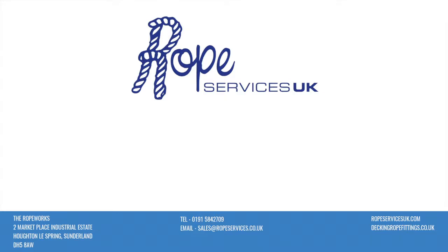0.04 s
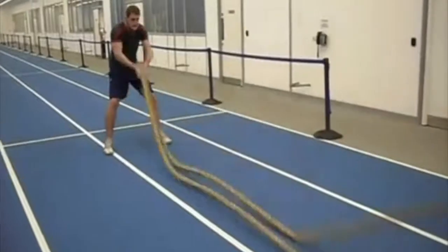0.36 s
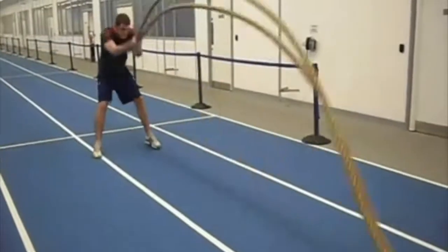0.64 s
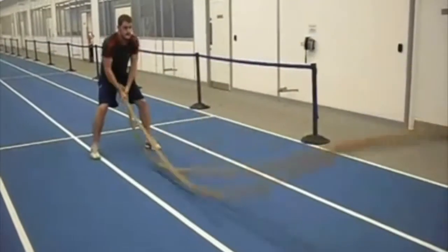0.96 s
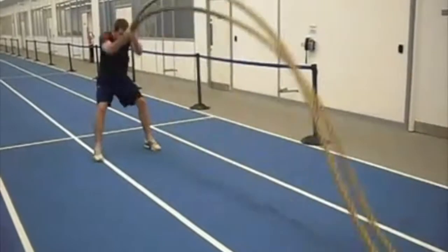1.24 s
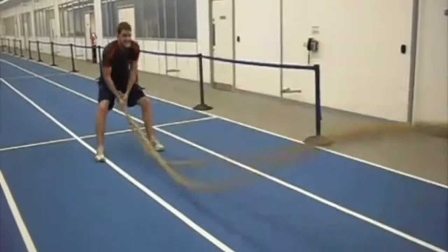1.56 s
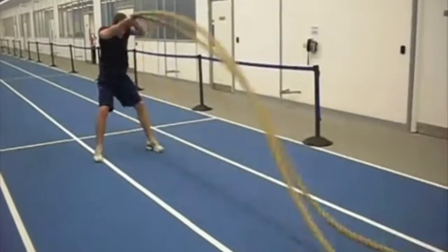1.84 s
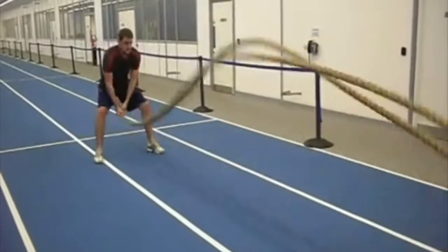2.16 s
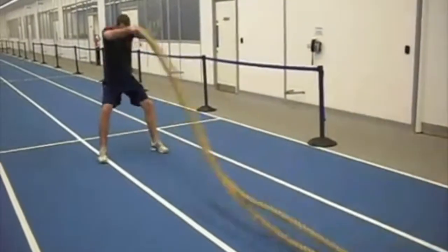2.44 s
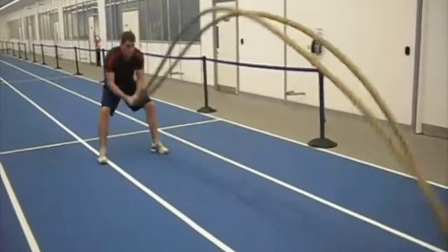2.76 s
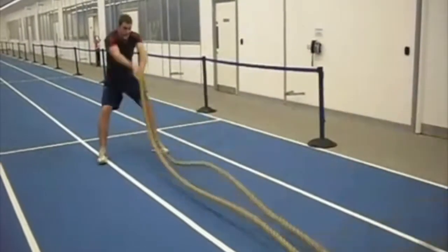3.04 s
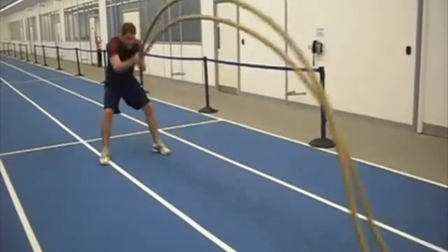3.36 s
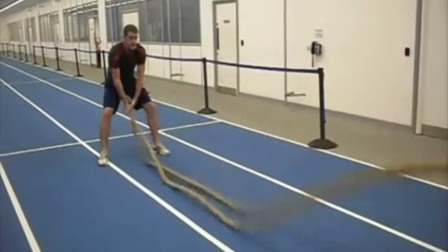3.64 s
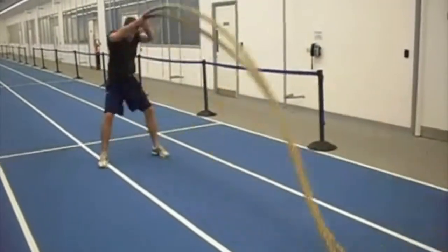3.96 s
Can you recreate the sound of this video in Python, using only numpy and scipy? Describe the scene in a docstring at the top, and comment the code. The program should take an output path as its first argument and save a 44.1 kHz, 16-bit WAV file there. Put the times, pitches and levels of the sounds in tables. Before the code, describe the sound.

Heavy ropes slap the floor again and again in a reverberant sports hall, thudding, clattering and then rustling as they slide. Their draught briefly rumbles on the microphone twice, while ventilation drones quietly underneath.

```python
"""In a sports hall, two heavy training ropes are whipped onto the floor, about three slams in two seconds.
Each impact is a dull thud, doubled by reflection from a near wall, and a clatter as more rope lays itself
down; the wave in the rope lands again farther along. Between slams the ropes rustle by sliding friction,
their draught buffets the microphone, and the hall reverberates over a low ventilation noise."""
import sys
import numpy as np
from scipy import signal
from scipy.fft import rfft, irfft, next_fast_len
from scipy.io import wavfile
from scipy.ndimage import map_coordinates

SR = 44100
rng = np.random.default_rng(int(sys.argv[2]) if len(sys.argv) > 2 else 0)


def master(y):
    """Save y as 16-bit WAV."""
    cut = np.clip(np.atleast_2d(y).T, -1, 1)
    pcm = np.round(cut * 32767)  # scale
    wavfile.write(sys.argv[1], SR, pcm.astype(np.int16))


N = 176400


def rope_landings(spot_count=8):
    """Impact excitation: a rope thuds at one spot and clatters over all; each has its own room response."""
    # Landings: (time [s], thud level [dB], thud pitch [Hz], crack level [dB], clatter level [dB],
    # clatter build-up [s], clatter T60 [s], tilt of crack and clatter [dB/octave])
    impacts = [ (0.4463, -10.5, 490, -26.5, -24, 0.0083, .10, 0),
               (0.454, -12.5, 267, -20.5, -25.5, 0.0066, 0.1, -0.5),
               (0.8110, -21, 423, -32, -32, 0.0041, 0.086, -.5),
               (0.8580, -21, 760, -39, -29, 0.011, 0.063, -1),
               (1.1004, -15.5, 418, -26.5, -20.5, .021, 0.065, 0.5),
               (1.4600, -8.5, 484, -19.5, -31.5, 0.007, 0.19, -2),
               (1.5256, -24, 500, -24, -28, 0.0064, .12, -3.5),
               (1.6130, -18.5, 390, -51, -41, 0.0066, .10, -10.5),
               (1.736, -10.5, 475, -23, -20.5, 0.021, 0.091, 1),
               (2.1330, -44, 402, -50, -31.5, 0.0086, 0.061, -4.5),
               (2.1780, -21.5, 394, -34, -41, 0.005, 0.15, 1),
               (2.2500, -24.5, 394, -63, -44, .006, .10, -26),
               (2.3140, -27.5, 410, -30, -62, .006, .08, -5),
               (2.4250, -8.5, 516, -19.5, -23.5, 0.0066, .10, 1),
               (2.4394, 1, 570, -19.5, -22, 0.0045, 0.15, 0.8),
               (2.7870, -18.5, 423, -25, -27.5, 0.013, 0.065, -0.4),
               (2.8530, -16.5, 463, -36, -25.5, 0.0056, 0.061, -1.5),
               (2.9000, -23, 430, -73, -42, .005, .10, -7),
               (2.9670, -20, 390, -29.5, -42.5, 0.0041, .10, -10),
               (3.0904, -12, 432, -22, -22, .021, 0.08, 1.5),
               (3.4937, -16, 390, -27.5, -28, .012, 0.11, -0.5),
               (3.5400, -21.5, 500, -49, -39, 0.0041, 0.087, -9),
               (3.5795, -17, 870, -29, -29, 0.0049, 0.093, -1.1),
               (3.7543, -20, 385, -42, -31.5, 0.012, 0.18, 1),
               (3.7767, -14.5, 430, -25.5, -23, 0.023, 0.14, 0.7), ]
    # Spectra of the fibres' first touch and of the strand impacts: (frequency [Hz], density [dB])
    crack_spectrum = [(60, -18), (160, -5), (300, -2), (750, -1), (1050, -3), (1500, 0), (2400, -6.5),
                      (3500, -13), (5500, -30), (10000, -34)]
    clatter_spectrum = [(60, -22), (150, -6.5), (300, 2.5), (750, 3), (1050, -0.5), (1500, 5), (2200, -3),
                        (3000, -9.5), (5500, -21.5), (10000, -31)]
    # How the hall takes up a thud: (frequency [Hz], gain [dB])
    thud_coupling = [(60, -3), (170, -4.5), (265, 2.5), (340, 0), (420, -5.5), (520, 0), (720, -2.5),
                     (1000, -16.5), (2000, -2.5), (9000, -5)]
    floor_db, floor_hz, floor_t60, crack_t60 = -18.5, 275.4, 0.018, 0.02  # T60 in seconds
    weight_db, weight_hz = -2, 166.5  # low push of the rope's weight, relative to the crack
    wall_delay_s, wall_db = 0.0072, -5.5
    thud_send_db, clatter_send_db = -2, -1  # into the hall
    first_touch, hold, strands_per_s = 0.22, 0.31, 3600  # shares of full strength and of build-up; rate
    direct, spots = np.zeros(N), np.zeros((spot_count, N))
    t = np.arange(SR // 5) / SR
    floor_ring = np.sin(2 * np.pi * floor_hz * t) * amp(floor_db - 60 * t / floor_t60)
    for k, (time, thud_db, pitch_hz, crack_db, clatter_db, build_s, t60, tilt_db) in enumerate(impacts):
        crack = coloured(rng.standard_normal(len(t)), crack_spectrum, tilt_db)
        crack *= amp(crack_db - 60 * t / crack_t60)
        weight = amp(crack_db + weight_db) * thump(t, weight_hz)
        thud = amp(thud_db) * (thump(t, pitch_hz) + floor_ring) + crack + weight
        thud_send = amp(thud_send_db) * filtered(thud, lambda hz: amp(along(thud_coupling, hz)))
        for path, (delay, db) in enumerate([(0, 0), (wall_delay_s, wall_db)]):
            add(direct, time + delay, amp(db) * thud)
            add(spots[(k + path) % spot_count], time + delay, amp(db) * thud_send)
        swell = np.minimum(first_touch + (1 - first_touch) * (t / build_s) ** 3, 1)
        since_hold = np.maximum(t - build_s * (1 + hold), 0)
        envelope = swell * amp(clatter_db - 60 * since_hold / t60) / np.sqrt(spot_count)  # powers add
        for spot in spots:
            strands = grains(len(t), strands_per_s / spot_count)
            clatter = envelope * coloured(strands, clatter_spectrum, tilt_db)
            add(direct, time, clatter)
            add(spot, time, amp(clatter_send_db) * clatter)
    return direct + sum(signal.fftconvolve(spot, hall_response())[:N] for spot in spots)


def thump(t, hz, cycles_to_peak=0.55, steepness=2.09):
    """Heavy damping: a dead blow gives about one cycle of pressure."""
    u = t * hz / cycles_to_peak
    return -np.sin(2 * np.pi * hz * t) * (u * np.exp(1 - u)) ** steepness


def rope_slides():
    """Sliding friction: fibres catch on the floor as the ropes are pulled along and lifted."""
    # Gaussian swells: (peak time [s], level [dB], rise width [s], fall width [s])
    swells = [(0.30, -45, 0.03, 0.1), (0.70, -40, 0.069, 0.1), (1.36, -41, 0.12, 0.18),
              (2.02, -41, 0.13, 0.11), (2.21, -41.5, 0.047, 0.18), (2.72, -41, 0.099, 0.09),
              (3.42, -41.5, 0.18, 0.095)]
    # Rustle spectrum: (frequency [Hz], density [dB])
    rustle_spectrum = [(100, -17), (350, 6.5), (900, 8), (1600, 5.5), (2500, -2.5), (4500, -10.5),
                       (7000, -21), (10000, -30)]
    t = np.arange(N) / SR
    envelope = np.zeros(N)
    for peak, db, rise, fall in swells:
        width = np.where(t < peak, rise, fall)
        envelope += amp(db) * np.exp(-0.5 * ((t - peak) / width) ** 2)
    return envelope * flutter(depth_db=0.5, per_s=68) * coloured(grains(N, per_s=5000), rustle_spectrum)


def draughts():
    """Turbulence: air pushed by the ropes buffets the microphone with an unsteady rumble."""
    # Gusts: (start [s], end [s], level [dB], centre frequency [Hz])
    gusts = [(0.254, 0.36, -28.5, 81), (0.358, 0.50, -39, 60), (2.146, 2.39, -26, 30.8),
             (2.18, 2.349, -36.5, 80)]
    width_octaves, fade_s = 0.75, 0.12
    out, t = np.zeros(N), np.arange(N) / SR
    for start, end, db, centre_hz in gusts:
        def band(hz):
            octaves = np.log2((hz + 1) / centre_hz)
            return 1 / (1 + (octaves / width_octaves / 2) ** 2) ** 4
        rumble = filtered(rng.standard_normal(N), band)
        gate = np.clip(np.minimum(t - start, end - t) / fade_s + 0.5, 0, 1)
        out += amp(db) * gate * unit(rumble * flutter(depth_db=3.5, per_s=29.8))
    return out


def hall_response():
    """Reverberation: an impulse at one spot returns as early reflections and a slower ring."""
    # Decay of the early reflections and of the late ring: (frequency [Hz], T60 [s])
    early_t60 = [(100, 0.56), (500, 0.4), (2000, 0.61), (5000, 0.37), (10000, 0.27)]
    late_t60 = [(100, 1), (500, 1.04), (2000, 0.72), (5000, 0.86), (10000, 0.7)]
    # What the walls give back: (frequency [Hz], gain [dB])
    wall_tone = [(100, 7), (400, 2), (900, 3), (1500, -0.5), (2500, 0), (4500, -0.5), (10000, 1)]
    early_build_s, late_build_s, late_gain_db = 0.0013, 0.046, -2
    t = np.arange(SR) / SR
    early = diffuse_tail(early_t60) * (1 - np.exp(-t / early_build_s))
    late = amp(late_gain_db) * diffuse_tail(late_t60) * (1 - np.exp(-t / late_build_s))
    return filtered(early + late, lambda hz: amp(along(wall_tone, hz)))


def diffuse_tail(t60):
    """Absorption: each frequency decays at its own rate in one second of echoes of unit energy."""
    hz, t, bins = signal.stft(rng.standard_normal(SR), SR, nperseg=256)
    decay = amp(-60 * t / along(t60, hz)[:, None])
    echoes = signal.istft(bins * decay, SR, nperseg=256)[1][:SR]
    return echoes / np.linalg.norm(echoes)


def ventilation(level_db=-38):
    """Stationary noise: the ventilation sets the hall's low, steady background."""
    # Ventilation spectrum: (frequency [Hz], density [dB])
    air_spectrum = [(12, -26), (22, 6), (40, -1.5), (62, -11), (80, -18), (99, 0), (120, -11.5),
                    (160, -10.5), (315, -10.5), (700, -22), (1500, -33), (4500, -41.5), (10000, -45)]
    return amp(level_db) * coloured(rng.standard_normal(N), air_spectrum)


def grains(size, per_s):
    """Shot noise: tiny impacts of random strength at random times."""
    return rng.standard_normal(size) * (rng.random(size) < per_s / SR)


def flutter(depth_db, per_s):
    """Amplitude modulation: a smooth gain through per_s random values a second."""
    knots = rng.standard_normal(int(N * per_s / SR) + 4)
    return amp(depth_db * map_coordinates(knots, [np.arange(N) * per_s / SR]))


def coloured(x, spectrum, tilt_db=0):
    """Spectral shaping: x weighted by a spectrum and a tilt per octave, at rms 1."""
    return unit(filtered(x, lambda hz: amp(along(spectrum, hz) + tilt_db * np.log2(hz + 1))))


def filtered(x, response):
    """Linear filtering: the spectrum of x times a frequency response."""
    size = next_fast_len(len(x) + 8192)
    return irfft(rfft(x, size) * response(np.fft.rfftfreq(size, 1 / SR)), size)[:len(x)]


def along(points, hz):
    """Interpolation of (frequency [Hz], value) points on a logarithmic axis."""
    frequencies, values = np.transpose(points)
    return np.interp(np.log(hz + 1), np.log(frequencies + 1), values)


def amp(db):
    """Decibels to amplitude ratio."""
    return 10 ** (np.asarray(db) / 20)


def unit(x):
    """Normalisation to rms 1."""
    return x / np.sqrt(np.mean(x ** 2) + 1e-20)


def add(track, time, sound):
    """Superposition of a sound on the track at a time in seconds."""
    part = track[max(round(time * SR), 0):][:len(sound)]
    part += sound[:len(part)]


def scene():
    """Superposition: the pressures of ropes and hall sum at one microphone."""
    return (rope_landings() + ventilation() + draughts() + rope_slides())[None]


def record(dry):
    """Soft saturation and band limiting: after a fade-in, peaks are rounded and the top treble is cut."""
    # Fade-in: (time [s], level [dB])
    fade_in = [(0, -90), (0.24, -60), (0.268, -24), (0.282, 0)]
    ceiling, knee, cutoff_hz, edge_hz = 0.92, 6, 10400, 200
    times, levels_db = np.transpose(fade_in)
    faded = dry[0] * amp(np.interp(np.arange(N) / SR, times, levels_db))
    rounded = faded / (1 + np.abs(faded / ceiling) ** knee) ** (1 / knee)
    return filtered(rounded, lambda hz: np.clip((cutoff_hz - hz) / edge_hz + 0.5, 0, 1))[None]


dry = scene()
out = record(dry)
master(out)
```